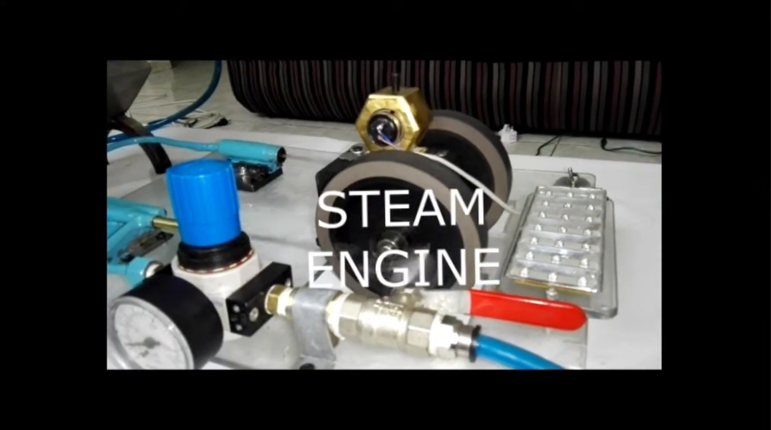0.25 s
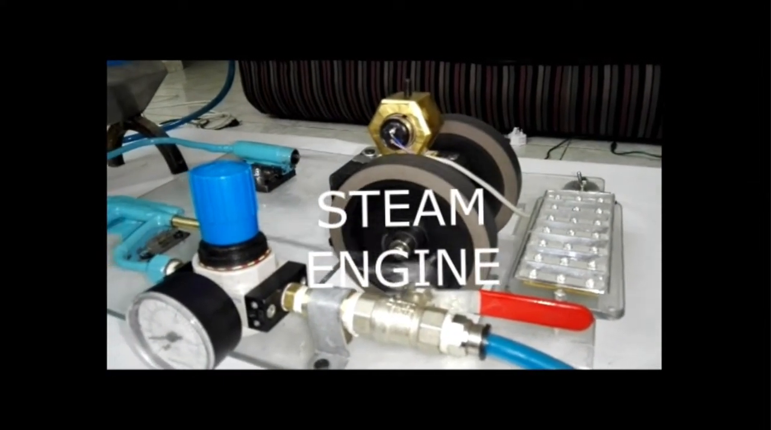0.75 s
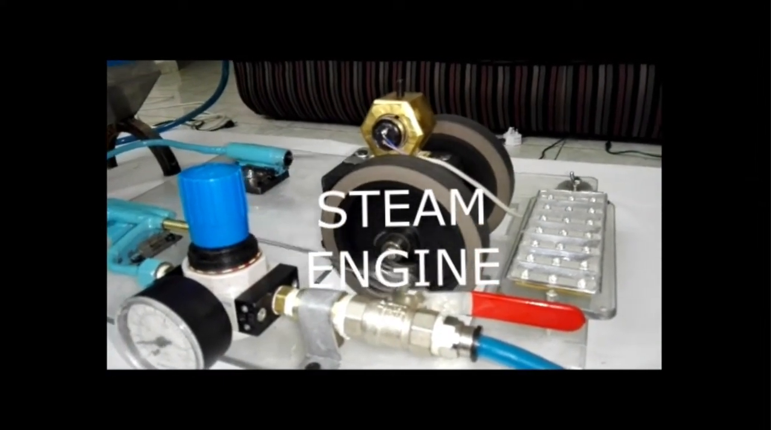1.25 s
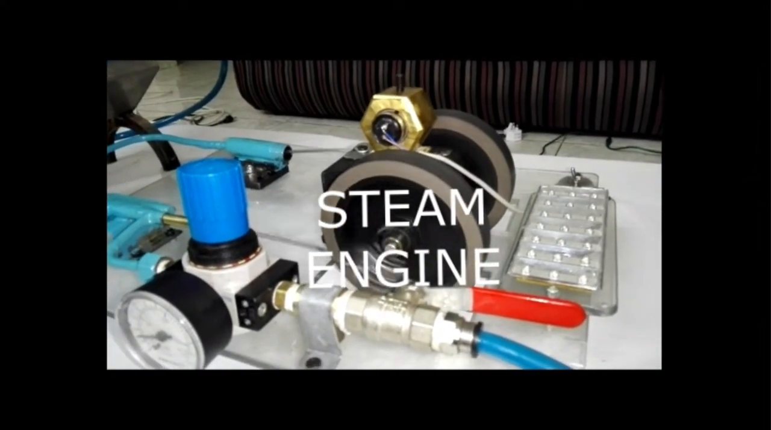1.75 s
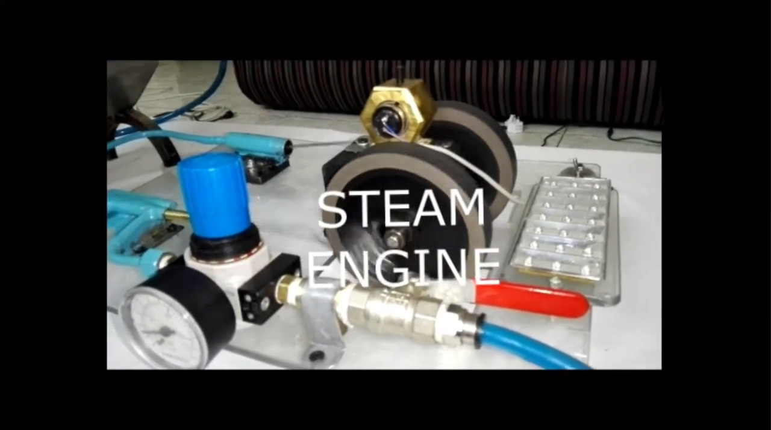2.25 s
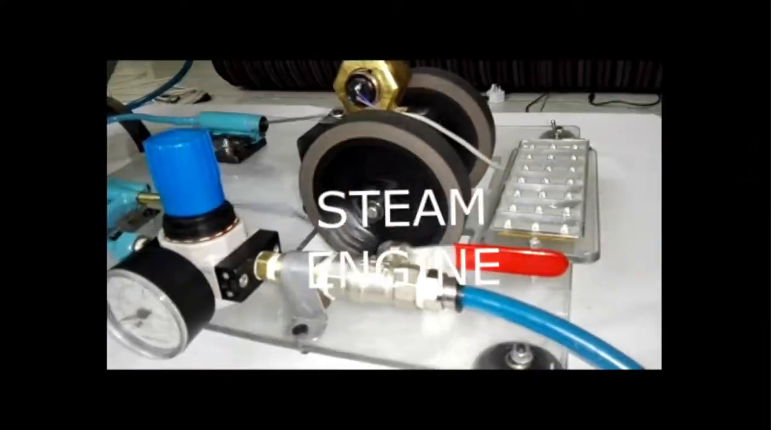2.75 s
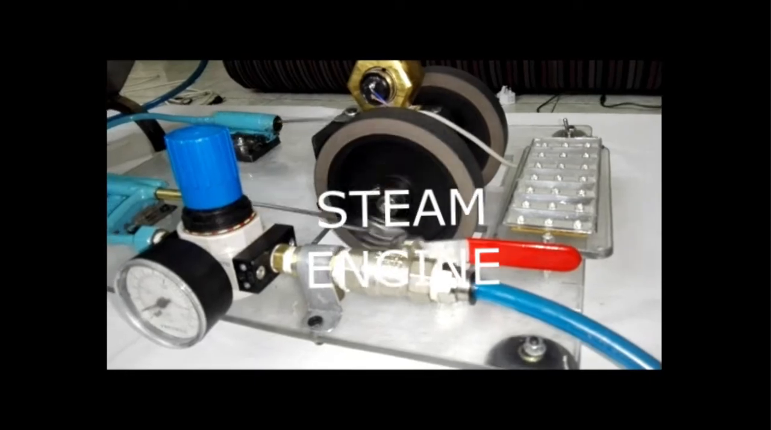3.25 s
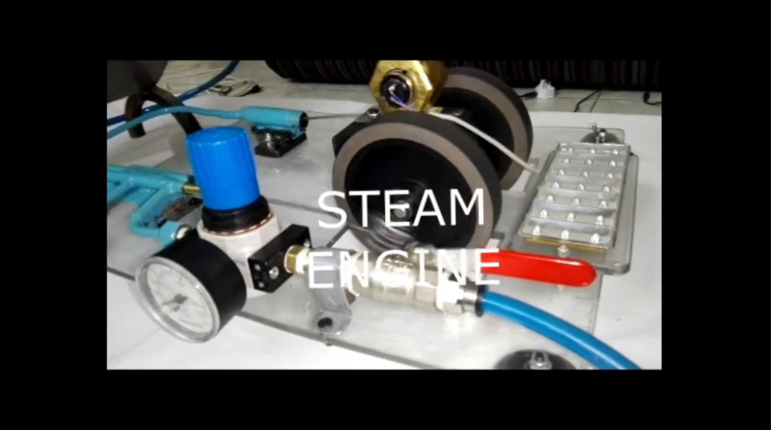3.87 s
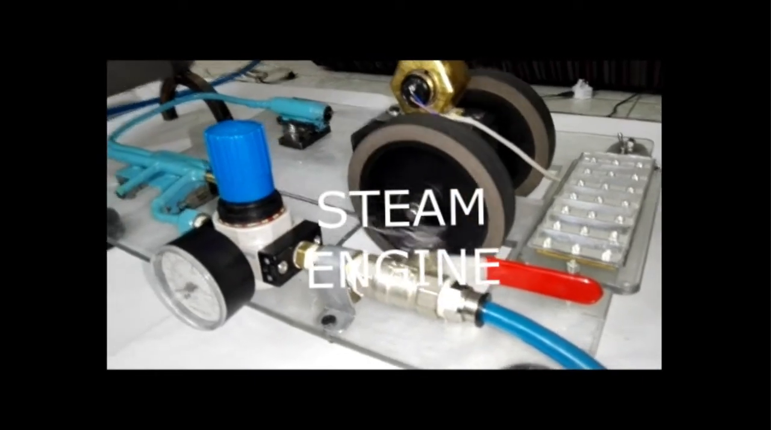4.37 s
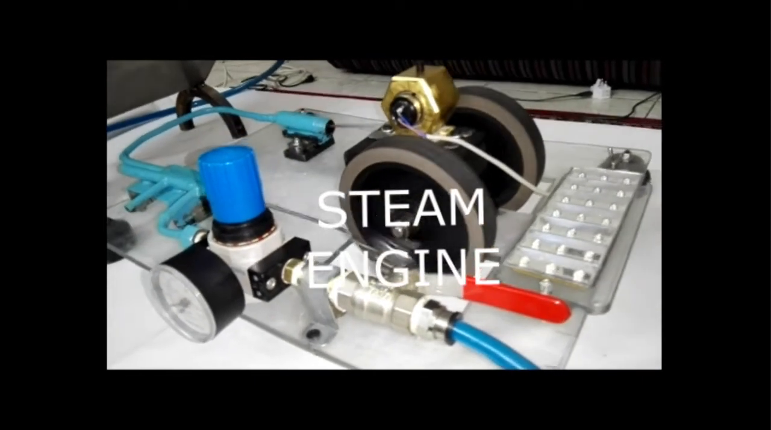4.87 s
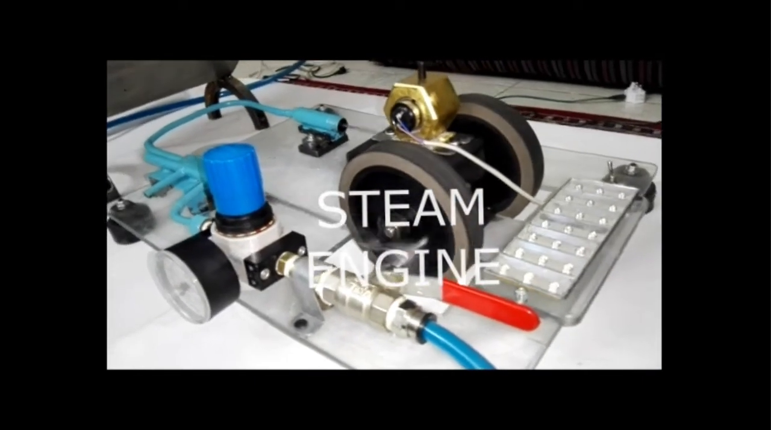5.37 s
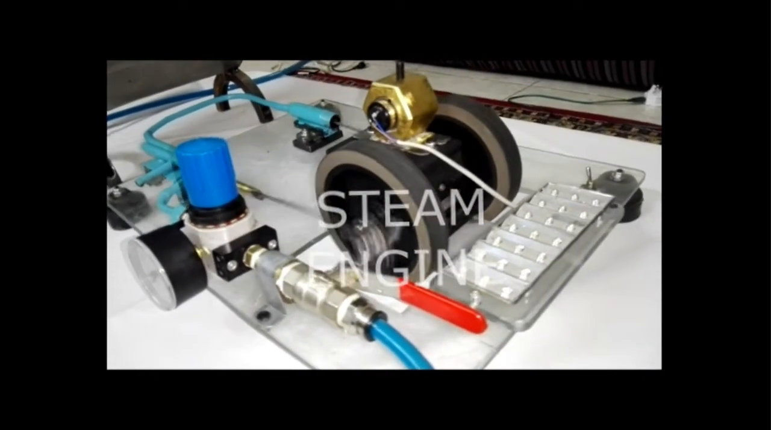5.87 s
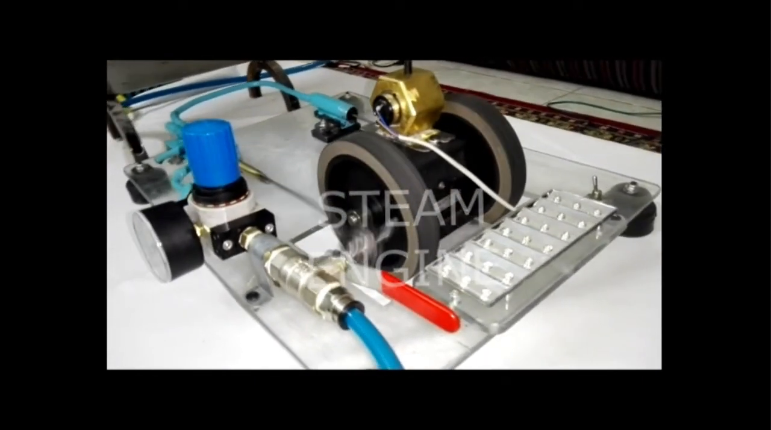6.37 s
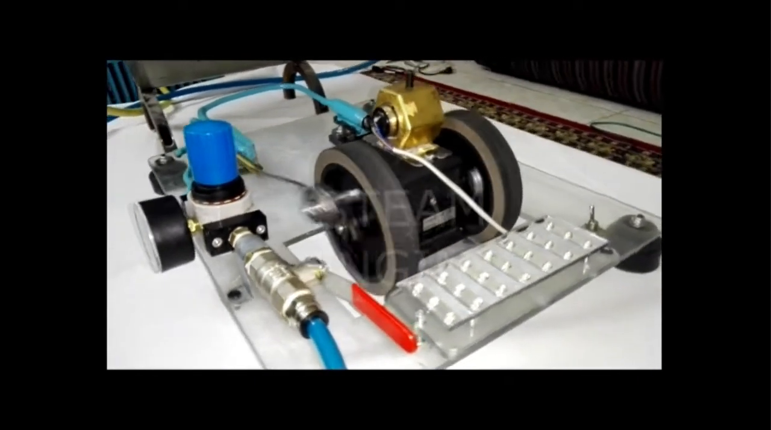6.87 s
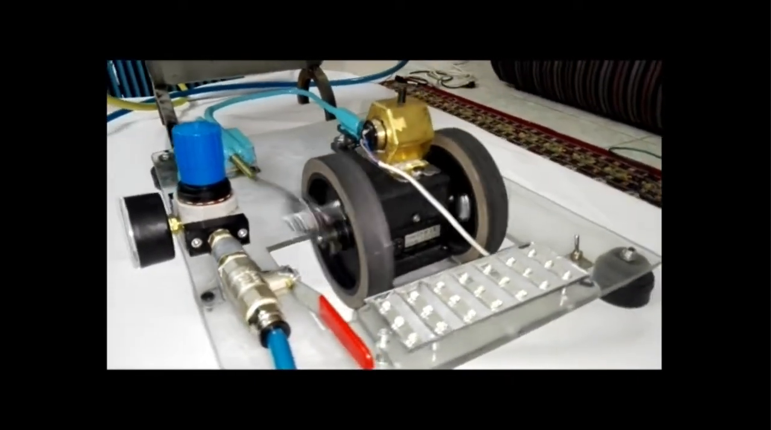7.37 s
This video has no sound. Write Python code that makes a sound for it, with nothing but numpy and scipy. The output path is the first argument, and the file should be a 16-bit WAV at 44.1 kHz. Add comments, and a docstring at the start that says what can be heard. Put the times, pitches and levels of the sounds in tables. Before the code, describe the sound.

From 0 to about 2.6 seconds, a small model engine on compressed air runs fast, heard very close in a small furnished room. Almost eight times a second comes a dry squeaky chirp, a strong breathy exhaust puff with a soft low thump of air, then a second raspy chirp. A loud, steady low compressor hum near 60 hertz, with faint casing rattle and air rush, lies underneath. At about 2.65 seconds it cuts abruptly: the hum vanishes and the engine runs slower, about six turns a second, with longer, softer puffs, clearer ringing chirps, crank grind and tiny ticks. Chirps grow more prominent around 5 to 6 seconds as the microphone circles and the hiss shifts in brightness. A tiny dropout occurs near 5.5 seconds. The even beat continues to the end, about 7.6 seconds, over faint room noise.

```python
"""On a table in a small furnished room, a model steam engine runs on compressed air, heard from close by.
Each turn gives a dry chirp (gliding tones plus scraping noise), an exhaust puff (shaped hiss plus a low push
of air) and a second chirp, over the grind of the crank. It first runs fast beside a humming air compressor,
made of motor tones and filtered noise. At 2.645 s the sound switches abruptly to a slower run without the
compressor, while the listening point moves round the engine. Faint room noise lies under both."""
import sys
import numpy as np
from scipy import signal
from scipy.fft import rfft, irfft, next_fast_len
from scipy.io import wavfile
from scipy.ndimage import uniform_filter1d, map_coordinates

SR = 44100
rng = np.random.default_rng(int(sys.argv[2]) if len(sys.argv) > 2 else 0)


def digitize_waveform(pressure):
    """Quantize a signal to 16-bit integers and store it at the path in sys.argv[1].

    Rows of a 2-D input are taken as channels; values are limited to [-1, 1].
    """
    field = np.atleast_2d(pressure).T
    bounded = np.clip(field, -1, 1)
    quanta = np.round(bounded * 32767).astype(np.int16)
    wavfile.write(sys.argv[1], SR, quanta)


N = 336042
T = np.arange(N) / SR  # time of each sample [s]

# Steady noise of the room: (frequency [Hz], relative level per hertz [dB])
ROOM_AIR = [(15, -22), (28, -5), (70, -2), (135, -0.5), (300, -16), (620, -15), (1500, -10), (3000, -19),
            (9500, -6.5), (14000, -21)]
# Compressor motor tones: (multiple of the motor speed [-], relative level [dB])
MOTOR_TONES = [(1, 1), (2, -15), (3, -37.5), (4, -25.5), (5, -30.5), (6, -36), (8, -35), (18, -33),
               (22, -29), (26, -21.5), (36, -31)]
# Resonances of the compressor casing: (frequency [Hz], width [Hz], relative level [dB])
CASING_RINGS = [(1644, 110, 4), (1300, 130, -4), (1840, 170, -1), (2350, 180, -9), (4350, 250, -18)]
# Air rushing into the compressor: (frequency [Hz], relative level per hertz [dB])
AIR_RUSH = [(20, 6), (120, 8), (250, -12), (450, -16), (650, -11), (1100, -5), (1700, -3.5), (3000, -9),
            (6500, -5), (9500, -15), (11500, -12), (14000, -21)]
# Faint steady ring of the engine frame: (frequency [Hz], width [Hz], level [dB])
FRAME_RING = (807, 15, -58.5)
# Grind of the crank, then rumble of the base plate: (frequency [Hz], relative level per hertz [dB])
CRANK_GRIND = [(300, -20.5), (650, -25.5), (800, -9.5), (950, -15), (1300, -9.5), (1640, 1), (1950, -9),
               (2300, -12), (4000, -15.5), (8000, -25.5)]
PLATE_RUMBLE = [(15, -16), (28, -5), (60, -2.5), (95, -1.5), (135, 1), (175, -6), (230, -9), (300, -16.5),
                (600, -18), (1200, -64)]
# Hiss of the inlet valve: (frequency [Hz], relative level per hertz [dB])
INLET_HISS = [(2000, -28), (4500, -11), (5500, 0), (7000, -1), (9700, -2), (11500, -6), (14000, -9)]
# Exhaust colour at each listening point: (frequency [Hz], relative level per hertz [dB])
JET_CLOSE = [(250, -9), (650, -13.5), (1180, -7.5), (1950, -8), (2400, -4.6), (2900, -7.0), (3650, 1),
             (4550, -5.5), (5300, -0.8), (6700, -4.5), (7800, -2.5), (9300, -1), (11000, -6.5),
             (14000, -11.5)]
JET_FRONT = [(250, -9.6), (650, -14), (1180, -5.5), (1950, -7.5), (2400, -4.0), (2900, -7.5), (3650, 0.5),
             (4550, -4.6), (5300, -0.9), (6700, -5), (7800, -4.5), (9300, -1.5), (11000, -6.5),
             (14000, -9.5)]
JET_ABOVE = [(250, -10), (650, -14.5), (1180, -5), (1950, -7.2), (2400, -2.5), (2900, -4.5), (3650, -4.5),
             (4550, -0.8), (5300, -6.5), (6700, -2.5), (7800, -0.5), (9300, 0.5), (11000, -1.5),
             (14000, -9.5)]
JET_CORNER = [(250, -15.5), (650, -16.5), (1180, -8.5), (1950, -10.0), (2400, -8), (2900, -6), (3650, -5.5),
              (4550, -7.5), (5300, 1), (6700, -7.5), (7800, -8), (9300, -3), (11000, -4.5), (14000, -10)]
JET_SIDE = [(250, -13.4), (650, -19), (1180, -10.5), (1950, -11.5), (2400, -7.5), (2900, -6.5),
            (3650, -0.8), (4550, -1), (5300, -2), (6700, -8), (7800, -7.9), (9300, -6), (11000, -8),
            (14000, -11.5)]
# When the listening point is close, front, front, above, corner, side: (time [s])
PLACE_TIMES = [2.6, 2.7, 3.8, 5.0, 6.05, 7.05]
# Push of air as it reaches the listener: (time [s], level relative to the puff [dB])
PUSH_LEVELS = [(0, -15), (2.6, -15), (2.8, -12), (4.5, -13), (5.5, -18), (7.6, -16.5)]
# Tones of the sliding parts on each stroke:
# (frequency [Hz], relative level early in the run [dB], relative level late in the run [dB])
FAST_OUT_TONES = [(1443, -7, -5), (1667, 2, 3), (2147, 0.5, -2.5), (2300, -19, -24), (2745, -22, -23),
                  (3241, -9, -8), (3920, -10, -4), (4290, -10, -14.8)]
FAST_BACK_TONES = [(1299, -1, 1), (1684, -2, -3), (2180, -2, 2), (2384, 1.5, 2.5), (2750, -10, -8),
                   (3250, -18, -18), (3930, -4, -4), (4100, -6.5, -3)]
SLOW_OUT_TONES = [(1270, -18.9, -14), (1614, 5.5, 2.5), (1916, -23, -7.5), (2320, -9, -22.5),
                  (2550, -20, -2.5), (3000, -27.4, -17), (3200, -29, -14), (3890, -13, -17)]
SLOW_BACK_TONES = [(1267, -12, -15.5), (1450, -8.5, -13), (1750, -4, -13), (1914, 2, 1), (2207, -11, -15),
                   (2729, -10, -9.5), (2955, -20, -22), (3146, -7, -15)]
# Scraping of the slide: (frequency [Hz], relative level per hertz [dB])
SLIDE_SCRAPE = [(600, -33), (1000, -15), (1300, -4), (1800, 3.5), (2600, -2.5), (3400, -7.5), (4000, -7.5),
                (4700, -15), (6000, -11), (9000, -21), (14000, -31)]
# Flywheel speed in each run: (time [s], speed [turns per second])
FAST_SPEED = [(0.2, 7.761), (2.0, 7.82)]
SLOW_SPEED = [(4.1, 6.191), (5.6, 6.2515), (7.6, 6.259)]
# Strokes of the slow run as the listening point moves:
# (time [s], out-stroke chirp level [dB], puff level [dB], return chirp level [dB])
SLOW_LEVELS = [(2.65, -20.5, -20.5, -26.5), (3.5, -21.5, -20.5, -27), (5.0, -18, -19, -22),
               (5.9, -19, -19, -21), (7.6, -22, -19, -24)]
# Brief dip in level: (start [s], end [s])
LEVEL_DIP = (5.4755, 5.495)

SWITCH_S = 2.645  # the fast run gives way to the slow one
MOTOR_HZ = 59.52  # compressor turns per second
TREBLE_LIMIT_HZ = 14350
FAST_START_S, SLOW_START_S = .0988, 2.7998  # one turn of each run starts here
# Moments within a turn, as shares of a turn after the out-stroke chirp
PUFF_AT, FAST_BACK_AT, SLOW_BACK_AT, TICK_AT = 0.29, .569, .549, 0.72
BACK_CREEP_PER_S = .0047  # the slow run's return chirp comes later by this share of a turn each second
FAST_OUT_DB, FAST_PUFF_DB, FAST_BACK_DB = -24.5, -15.7, -25.5  # out-stroke level is at time zero
OUT_GROWTH_DB_PER_S = 0.5  # the fast out-stroke chirp grows
CHIRP_SCATTER_DB, PUFF_SCATTER_DB = .5, 0.15  # random spread from turn to turn


def amp(db):
    """Turns decibels into gain."""
    return 10 ** (np.asarray(db) / 20)


def unit(x):
    """Scales a sound to an average (rms) size of 1."""
    return x / np.sqrt(np.mean(x ** 2) + 1e-20)


def noise():
    """Makes fresh white noise."""
    return rng.standard_normal(N)


def colour(x, points):
    """Filters by a spectrum of (frequency [Hz], level [dB]) points, then scales to rms 1."""
    size = next_fast_len(N)
    table_hz, table_db = np.transpose(points)
    hz = np.fft.rfftfreq(size, 1 / SR)
    gain = amp(np.interp(np.log(hz + 1), np.log(table_hz), table_db))
    return unit(irfft(rfft(x, size) * gain, size)[:N])


def resonance(x, hz, width):
    """Lets noise ring at one frequency, scaled to rms 1; a narrower width [Hz] rings longer."""
    b, a = signal.iirpeak(hz, hz / width, fs=SR)
    return unit(signal.lfilter(b, a, x))


def drift(rate_hz):
    """A slow wander of rms 1: twelve sines up to rate_hz with random starting points."""
    coarse_t = T[::100]
    rates = np.geomspace(rate_hz / 8, rate_hz, num=12)
    slow = sum(np.sin(2 * np.pi * (rate * coarse_t + rng.random())) for rate in rates)
    return unit(np.interp(T, coarse_t, slow))


def bell(lag, width):
    """A smooth swell around lag zero."""
    return np.exp(-.5 * (lag / width) ** 2)


def nearest(times, db):
    """For each sample: seconds from the nearest event, and the gain of that event."""
    halfway = (times[1:] + times[:-1]) / 2
    event = np.searchsorted(halfway, T)
    return T - times[event], amp(db)[event]


def surface(lag):
    """The same roughness passes under the moving parts on every turn, so this noise repeats."""
    roughness = rng.standard_normal(SR)
    return roughness[np.round(lag * SR).astype(int) % SR]


def turning(speed, start_s):
    """When each turn of the flywheel starts and how long it lasts [s]; one turn starts at start_s."""
    t = np.arange(-SR // 2, N + SR // 2) / SR
    rate = np.interp(t, *np.transpose(speed))
    turns = np.cumsum(rate) / SR
    turns = turns - np.interp(start_s, t, turns)
    new = np.flatnonzero(np.diff(np.floor(turns)))
    return t[new], 1 / rate[new]


def uneven(times, db, scatter_db):
    """Strokes at these times, each a little stronger or weaker than db."""
    return times, db + scatter_db * rng.standard_normal(len(times))


def room(x, t60, wet_db):
    """Sparse reflections of a small furnished room, fading by 60 dB in t60 seconds."""
    t = np.arange(SR // 2) / SR
    signs = rng.choice([-1., 1.], len(t))
    present = (rng.random(len(t)) < 2000 / SR) * (t > .003)  # about 2000 reflections a second
    taps = signs * present * amp(-60 * t / t60)
    echoes = signal.fftconvolve(x, taps / np.linalg.norm(taps))[:N]
    return x + amp(wet_db) * echoes


def room_air():
    """The room's steady background is noise shaped by a fixed spectrum."""
    return amp(-43.5) * colour(noise(), ROOM_AIR)


def compressor():
    """The motor hums at multiples of its speed, its strokes rattle the casing, and air rushes in."""
    turns = MOTOR_HZ * T + .012 * drift(5)  # the speed wavers a little
    hum = 0
    for multiple, db in MOTOR_TONES:
        hum = hum + amp(db) * np.sin(2 * np.pi * (round(multiple) * turns + rng.random()))
    strokes = noise() * (1 + .5 * np.cos(2 * np.pi * turns))  # swells once a motor turn
    rattle = sum(amp(db) * resonance(strokes, hz, width) for hz, width, db in CASING_RINGS)
    rush = colour(noise(), AIR_RUSH)
    return amp(-20.0) * unit(hum) + amp(-38.5) * unit(rattle) + amp(-35) * rush


def frame():
    """The running gear keeps the frame ringing faintly: noise through one narrow resonance."""
    hz, width, db = FRAME_RING
    return amp(db) * resonance(noise(), hz, width)


def crank(times, grind_db, rumble_db, knock_db):
    """Bearings grind, loudest twice a turn when the piston is fastest, and shake the base plate."""
    lag, _ = nearest(times, 0 * times)
    turn_s = np.mean(np.diff(times))
    speed = 1 + 0.42 * np.cos(4 * np.pi * lag / turn_s)
    grind = colour(surface(lag) + 0.41 * noise(), CRANK_GRIND)
    rumble = colour(surface(lag) + 0.85 * noise(), PLATE_RUMBLE)
    # The plate thuds as the load reverses, just before the out-stroke chirp
    knock = np.sin(2 * np.pi * 135 * lag) * bell(lag + 0.031, .008)
    return amp(grind_db) * speed * grind + amp(rumble_db) * rumble + amp(knock_db) * knock


def tick(times, db, width):
    """The valve rod takes up its play with a soft tick of noise once a turn."""
    lag, gain = nearest(*uneven(times, db, scatter_db=4.5))
    click = colour(noise(), [(1500, -22), (4000, -4), (6000, -6), (14000, -22)])
    return gain * click * bell(lag, width)


def inlet(times, db, width):
    """Fresh air sighs through the valve on the out-stroke, with a wandering level."""
    lag, _ = nearest(times, 0 * times)
    flutter = amp(1.7 * drift(30))
    return amp(db) * colour(noise(), INLET_HISS) * bell(lag + 0.0024, width) * flutter


def jet():
    """Turbulent exhaust hiss; its colour and its echo off the table change as the listening point moves."""
    white, hiss = noise(), 0
    places = [JET_CLOSE, JET_FRONT, JET_FRONT, JET_ABOVE, JET_CORNER, JET_SIDE]
    for points, here in zip(places, np.eye(len(places))):
        share = np.interp(T, PLACE_TIMES, here)  # fades from one place to the next
        hiss = hiss + share * colour(white, points)
    delay = np.interp(T, [2.6, 5.0, 7.5], [.0021, .0024, .0028])  # echo delay [s]
    echo = map_coordinates(hiss, [(T - delay) * SR], order=3)
    return unit(hiss + 0.11 * echo)


def exhaust(times, db, hiss, rise, fall, squareness, leak_db, body_power):
    """The port opens, shuts more slowly and leaks in between; a narrow gap hisses brighter than a wide one."""
    lag, gain = nearest(times, db)
    lag = lag + 0.0028  # the port is widest just before the given time
    duration = np.where(lag < 0, rise, fall) * amp(.4 * drift(10))  # puff lengths vary
    opening = np.exp(-abs(lag / duration) ** squareness)
    lowpass = signal.butter(2, 5500, fs=SR, output="sos")
    body = signal.sosfiltfilt(lowpass, hiss)
    bright = hiss - body
    leak = amp(leak_db)
    # The lower part of the hiss needs a wider gap
    flow = bright * np.hypot(opening, leak) + body * np.hypot(opening ** body_power, leak)
    eddies = amp(1.1 * unit(uniform_filter1d(noise(), size=70)))  # the jet sputters
    # A push of air as the port opens, a weaker suck as it shuts
    push = np.sin(2 * np.pi * 40 * lag) * bell(lag + .006, 0.0099)
    suck = 0.77 * np.sin(2 * np.pi * 40 * (lag - .029)) * bell(lag - .029, 0.0064)
    push_gain = amp(np.interp(T, *np.transpose(PUSH_LEVELS)))
    return gain * (flow * eddies + push_gain * (push - suck))


def chirp(times, db, modes, late, width, ring_s, ring_db, scrape_db, scrape_width):
    """The slide sings for a few cycles at mid-stroke, nearly alike on every turn, and the metal rings on."""
    lag, gain = nearest(times, db)
    # Bent time: the pitch peaks where the slide is fastest
    travel = lag + 0.034 * lag * bell(lag, width) - .02 * lag * bell(lag, 2 * width)
    tone, power = 0, 0
    for hz, early_db, late_db in modes:
        size = amp(early_db + (late_db - early_db) * late)
        oil_film = amp(0.54 * drift(6))  # each stroke finds the oil a little different
        tone = tone + size * oil_film * np.sin(2 * np.pi * (hz * travel + rng.random()))
        power = power + size ** 2 / 2
    tone = tone / np.sqrt(power)
    stroke = np.exp(-abs(lag / width) ** 1.43)
    ring_start = np.clip(.5 + lag / ring_s, 0, 1)
    ring = amp(ring_db) * np.exp(-abs(lag) / ring_s) * ring_start
    rubbing = colour(surface(lag) + 0.3 * noise(), SLIDE_SCRAPE)
    scrape = amp(scrape_db) * rubbing * bell(lag, scrape_width)
    return gain * (tone * np.hypot(stroke, ring) + scrape)


def fast_run(hiss):
    """Nearly eight flywheel turns a second drive short puffs and rasping chirps."""
    out_s, turn_s = turning(FAST_SPEED, FAST_START_S)
    outs = uneven(out_s, FAST_OUT_DB + OUT_GROWTH_DB_PER_S * out_s, CHIRP_SCATTER_DB)
    blows = uneven(out_s + PUFF_AT * turn_s, FAST_PUFF_DB, PUFF_SCATTER_DB)
    backs = uneven(out_s + FAST_BACK_AT * turn_s, FAST_BACK_DB, CHIRP_SCATTER_DB)
    late = np.clip(T / SWITCH_S, 0, 1)  # 0 = early tone levels, 1 = late ones
    grinding = crank(out_s, grind_db=-37, rumble_db=-41, knock_db=-49)
    valve = inlet(out_s, db=-38.5, width=0.011)
    puffs = exhaust(*blows, hiss, rise=.013, fall=.019, squareness=2.56, leak_db=-28, body_power=1.18)
    out = chirp(*outs, FAST_OUT_TONES, late, width=0.0057, ring_s=0.011, ring_db=-24,
                scrape_db=-6, scrape_width=0.0073)
    back = chirp(*backs, FAST_BACK_TONES, late, width=0.0074, ring_s=.012, ring_db=-11,
                 scrape_db=-4, scrape_width=0.0075)
    return grinding + valve + puffs + out + back


def slow_run(hiss):
    """About six flywheel turns a second drive longer puffs and clearer chirps."""
    out_s, turn_s = turning(SLOW_SPEED, SLOW_START_S)
    level_s, *levels = np.transpose(SLOW_LEVELS)
    out_db, puff_db, back_db = (np.interp(out_s, level_s, db) for db in levels)
    back_at = SLOW_BACK_AT + BACK_CREEP_PER_S * (out_s - SWITCH_S)
    outs = uneven(out_s, out_db, CHIRP_SCATTER_DB)
    blows = uneven(out_s + PUFF_AT * turn_s, puff_db, PUFF_SCATTER_DB)
    backs = uneven(out_s + back_at * turn_s, back_db, CHIRP_SCATTER_DB)
    late = np.interp(T, [3.8, 5.7], [0, 1])  # 0 = early tone levels, 1 = late ones
    grinding = crank(out_s, grind_db=-37, rumble_db=-42.5, knock_db=-37.5)
    ticks = tick(out_s + TICK_AT * turn_s, db=-42.5, width=0.001)
    valve = inlet(out_s, db=-44, width=0.024)
    puffs = exhaust(*blows, hiss, rise=0.019, fall=0.024, squareness=2.39, leak_db=-25.5, body_power=1.27)
    out = chirp(*outs, SLOW_OUT_TONES, late, width=0.0047, ring_s=0.0092, ring_db=-17,
                scrape_db=-10.5, scrape_width=0.0067)
    back = chirp(*backs, SLOW_BACK_TONES, late, width=0.0056, ring_s=0.0096, ring_db=-5.5,
                 scrape_db=-13, scrape_width=0.0064)
    return frame() + grinding + ticks + valve + puffs + out + back


def scene():
    """Room noise throughout; the fast run with the compressor, then the slow run alone."""
    after = np.clip(.5 + (T - SWITCH_S) / 0.0065, 0, 1)  # a 6.5 ms crossfade
    before = 1 - after
    hiss = jet()
    engine = room(before * fast_run(hiss) + after * slow_run(hiss), t60=0.26, wet_db=-14)
    return (room_air() + before * compressor() + engine)[None]


def record(dry):
    """The level dips briefly by up to 27 dB, and a low-pass filter removes the highest treble."""
    start_s, end_s = LEVEL_DIP
    dip = uniform_filter1d(((T > start_s) & (T < end_s)) * 1., size=40)  # softened edges
    lowpass = signal.firwin(1023, TREBLE_LIMIT_HZ, window=("kaiser", 9), fs=SR)
    return signal.oaconvolve(dry * amp(-27 * dip), lowpass[None], "same")


dry = scene()
out = record(dry)
digitize_waveform(out)
```